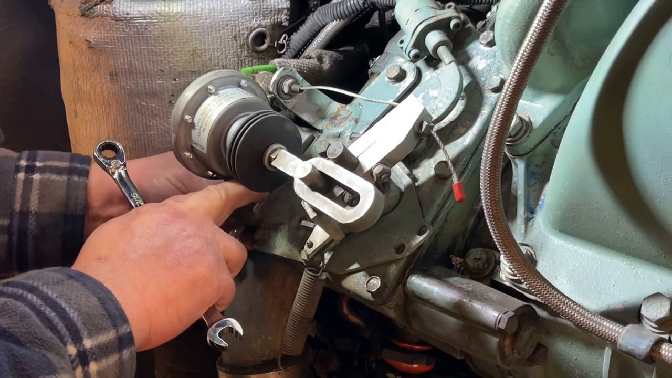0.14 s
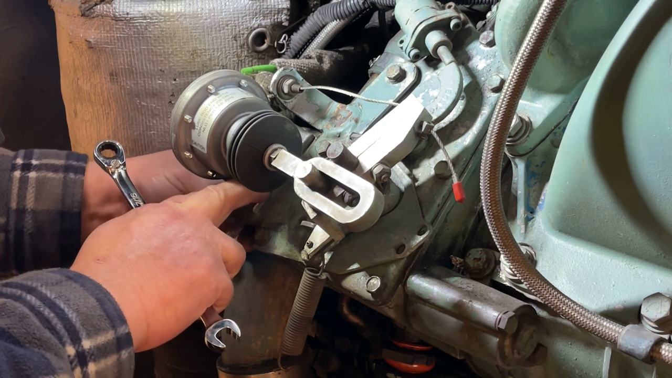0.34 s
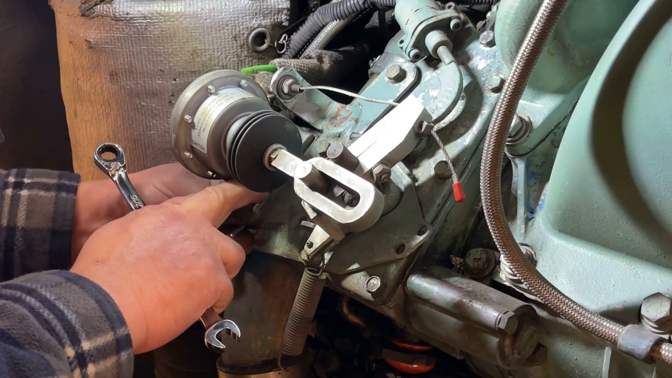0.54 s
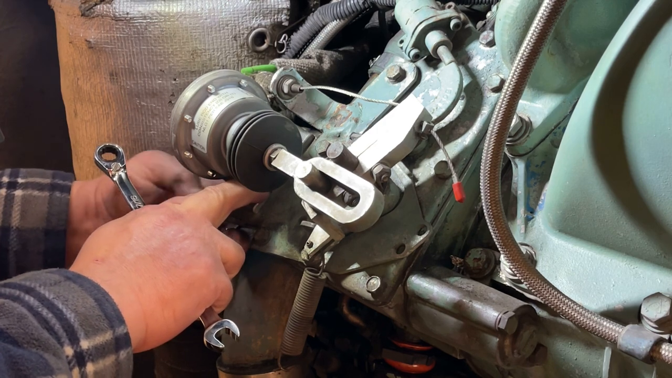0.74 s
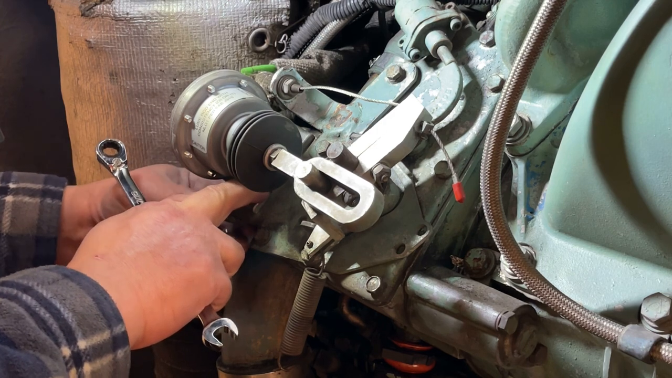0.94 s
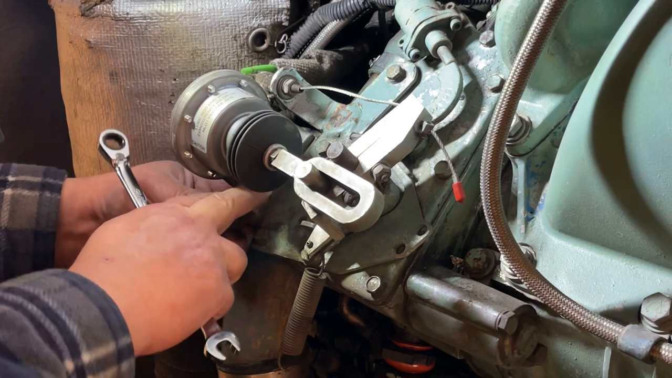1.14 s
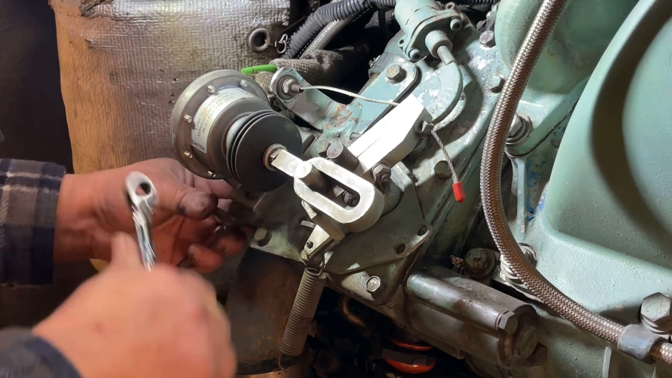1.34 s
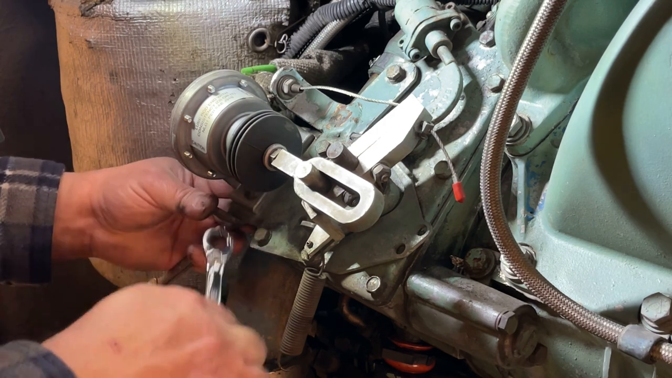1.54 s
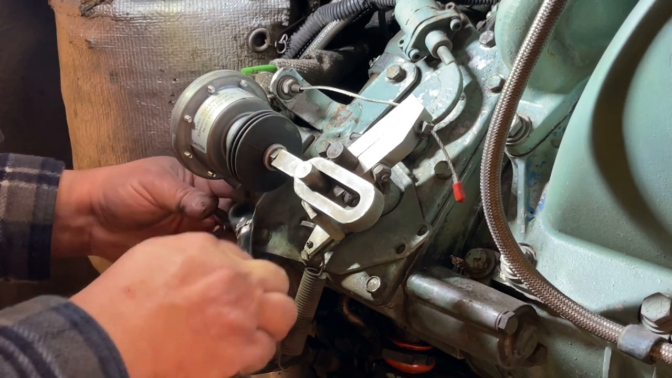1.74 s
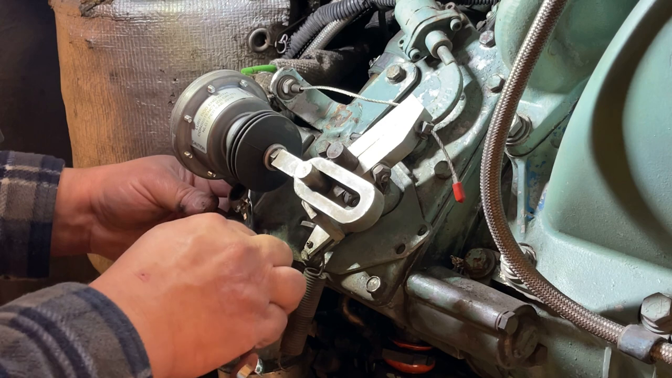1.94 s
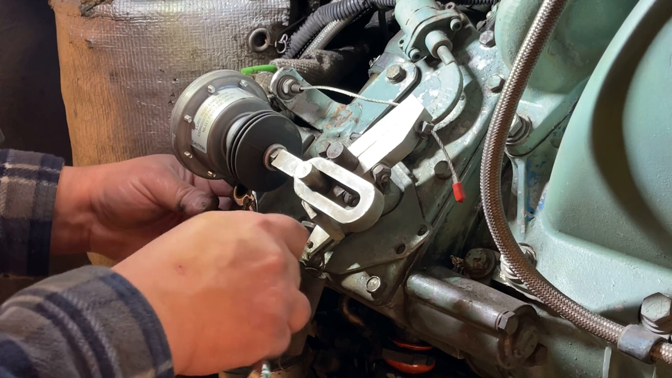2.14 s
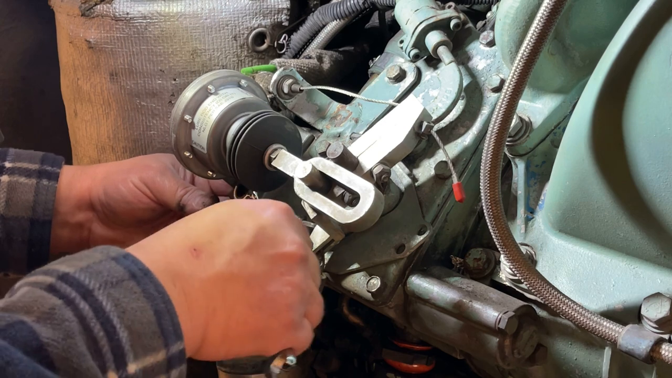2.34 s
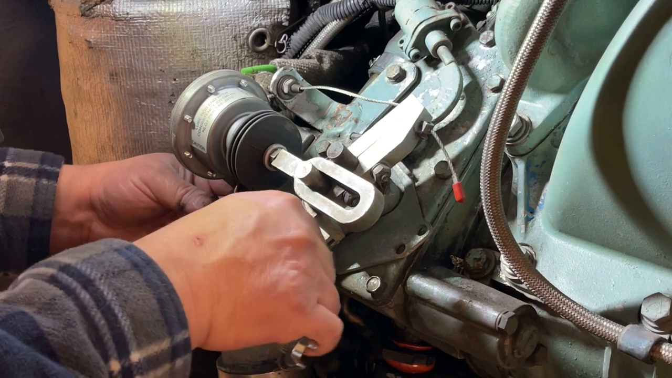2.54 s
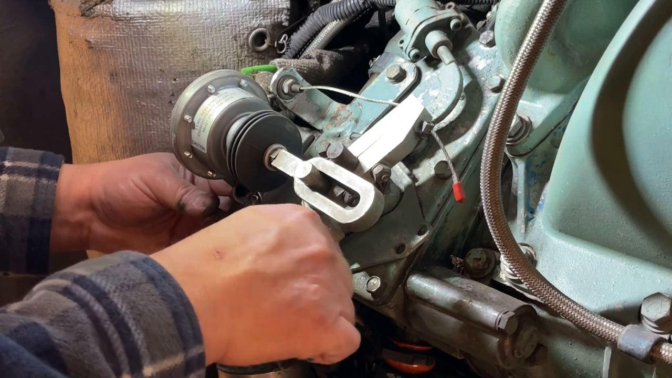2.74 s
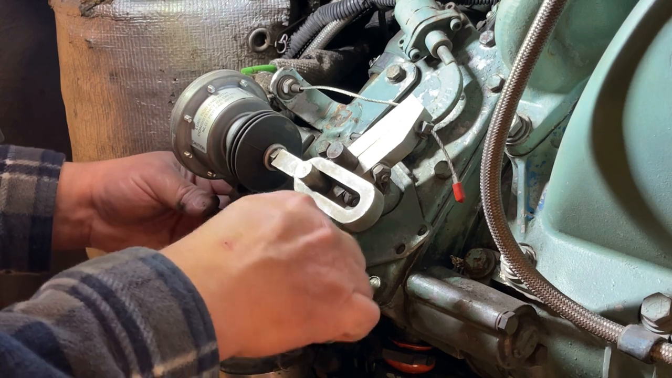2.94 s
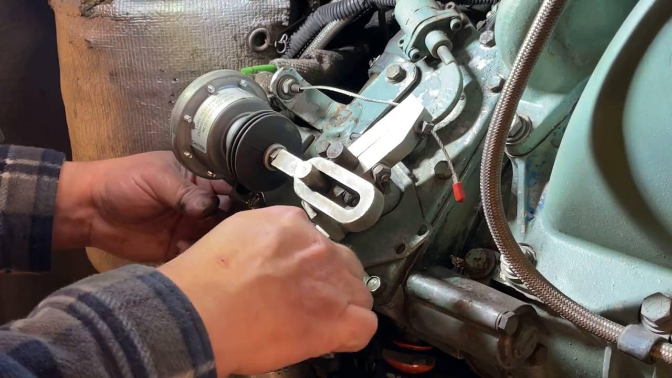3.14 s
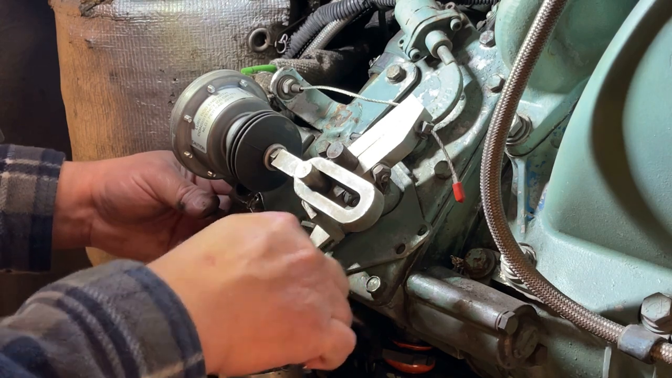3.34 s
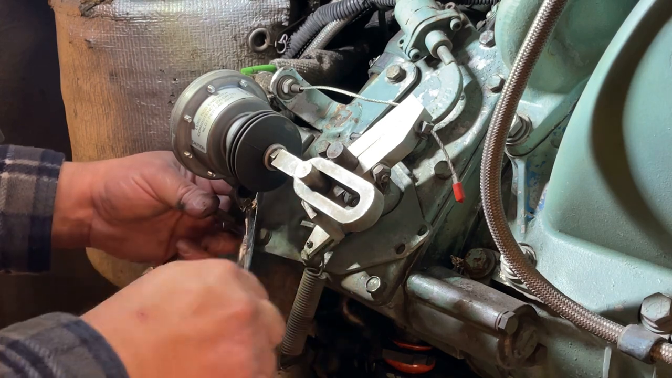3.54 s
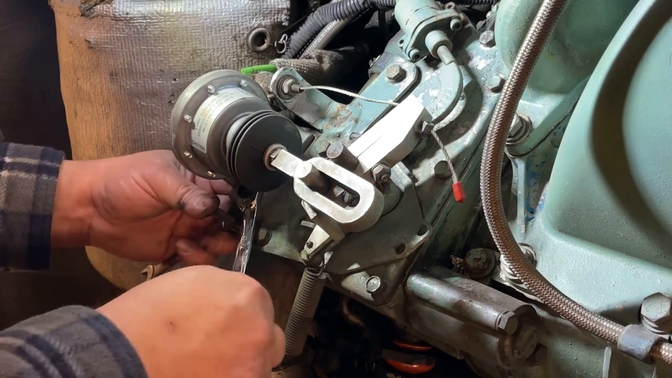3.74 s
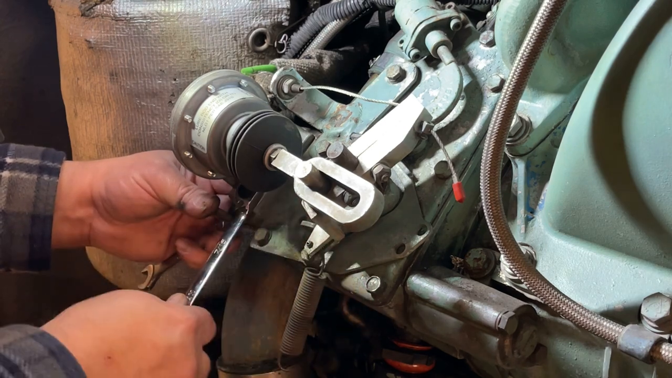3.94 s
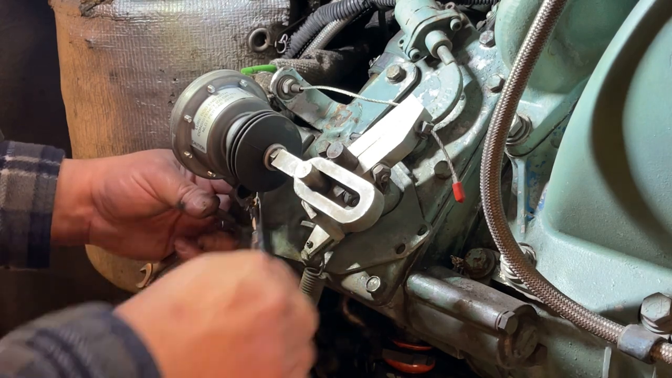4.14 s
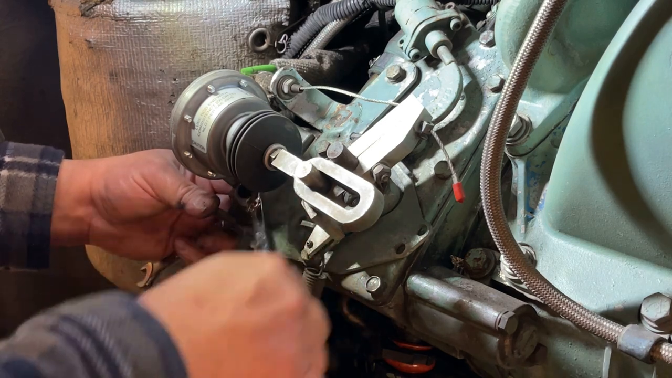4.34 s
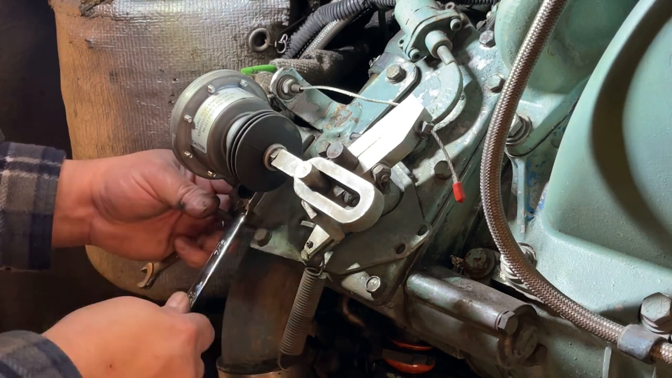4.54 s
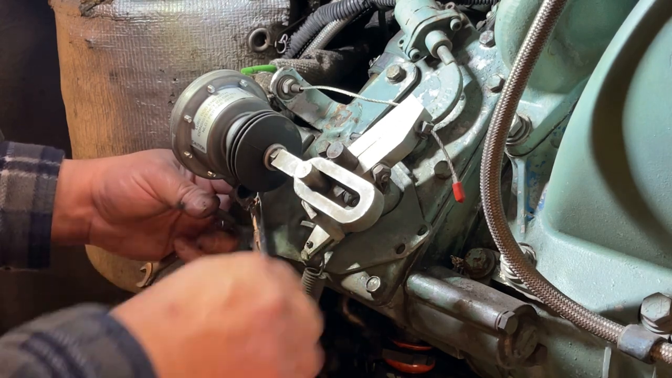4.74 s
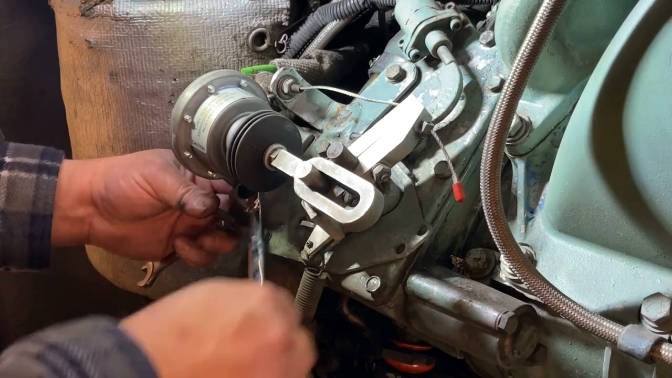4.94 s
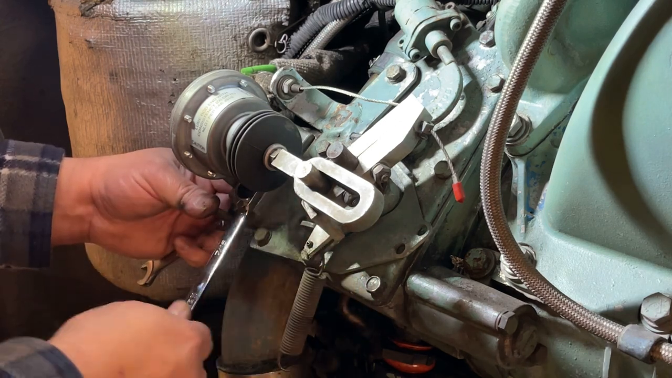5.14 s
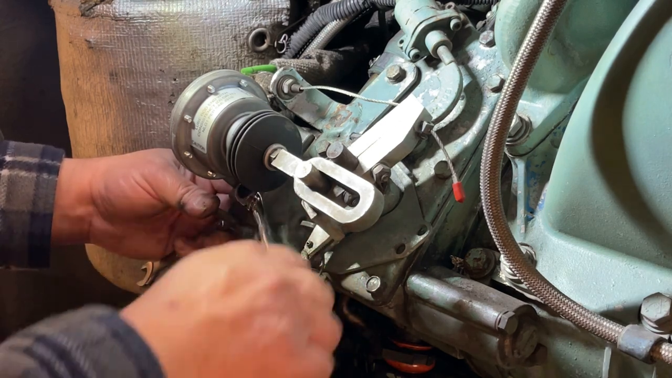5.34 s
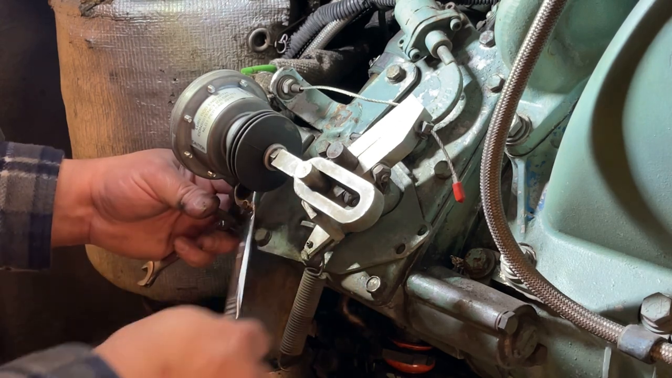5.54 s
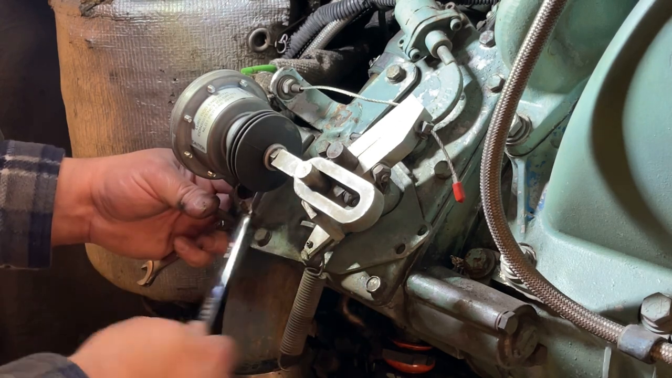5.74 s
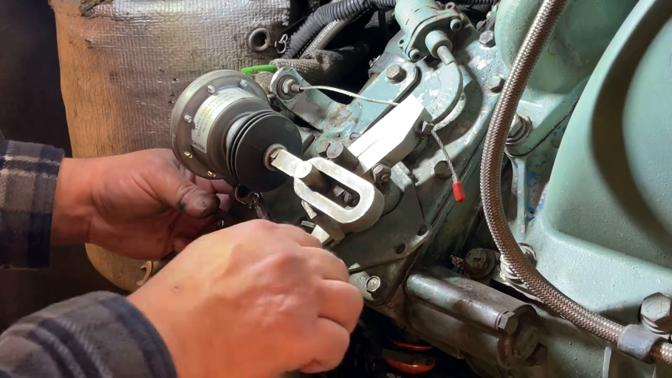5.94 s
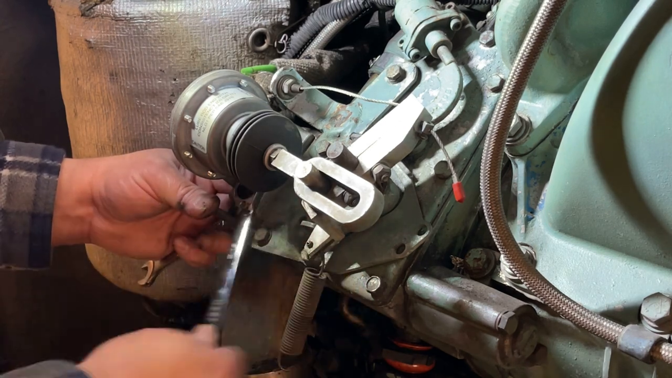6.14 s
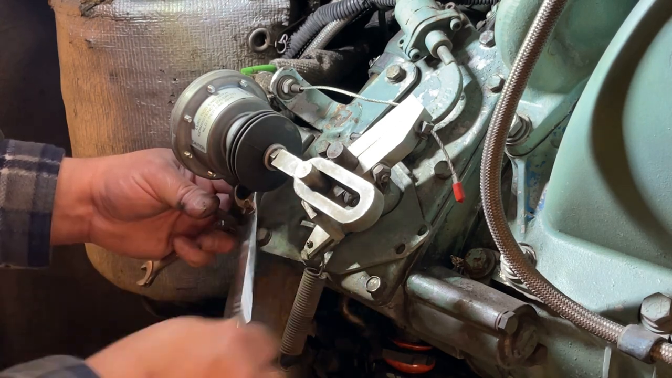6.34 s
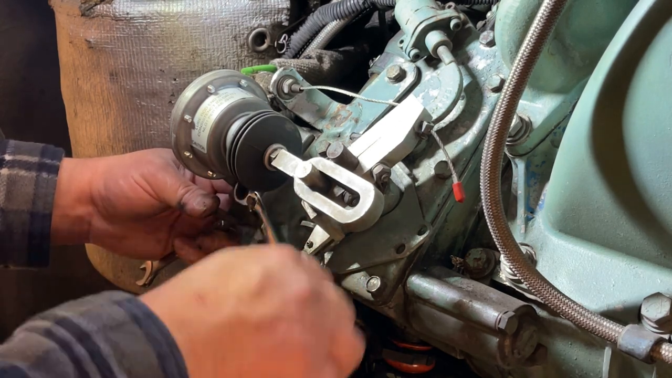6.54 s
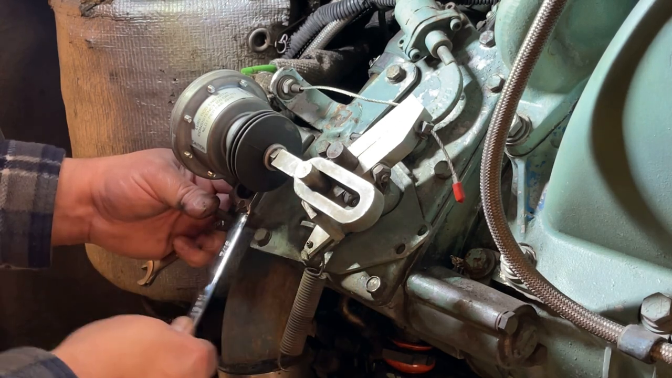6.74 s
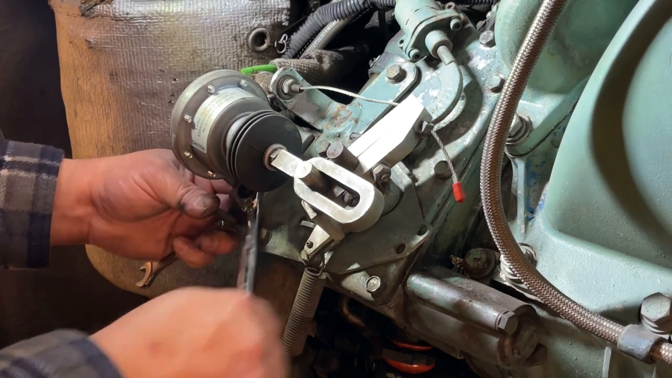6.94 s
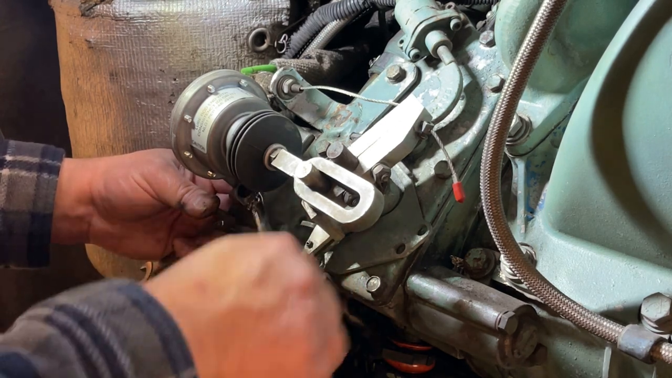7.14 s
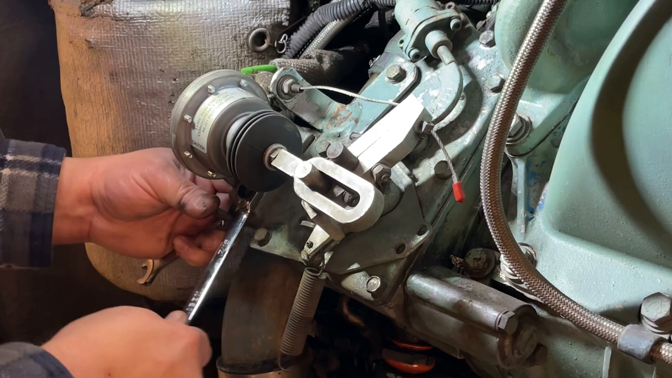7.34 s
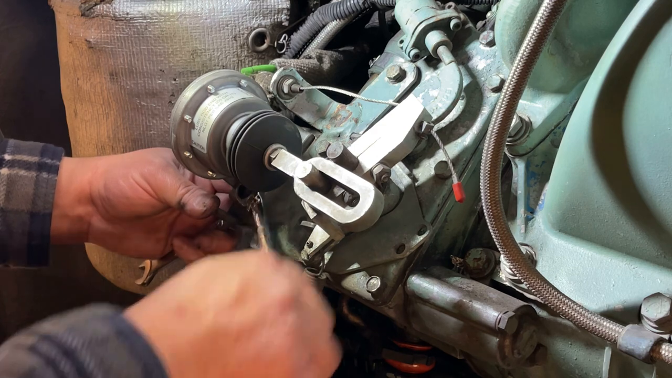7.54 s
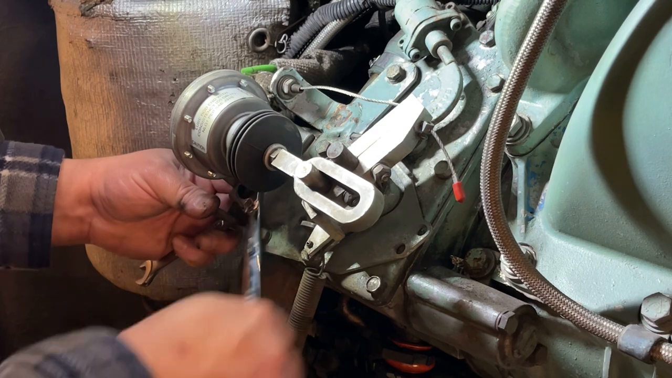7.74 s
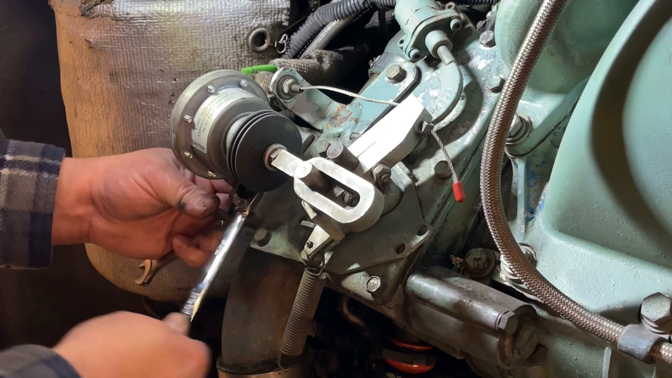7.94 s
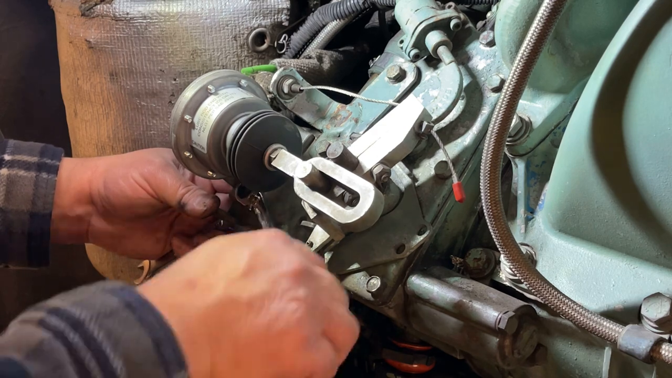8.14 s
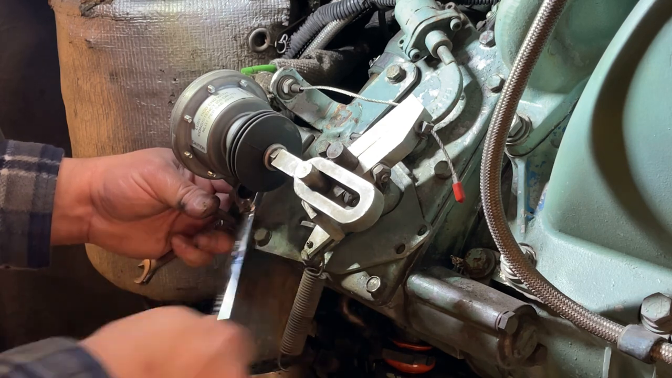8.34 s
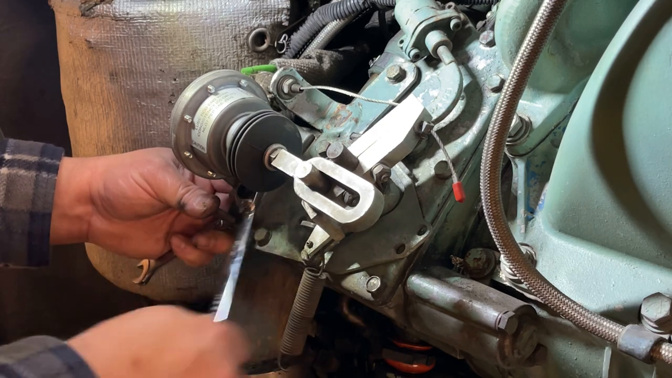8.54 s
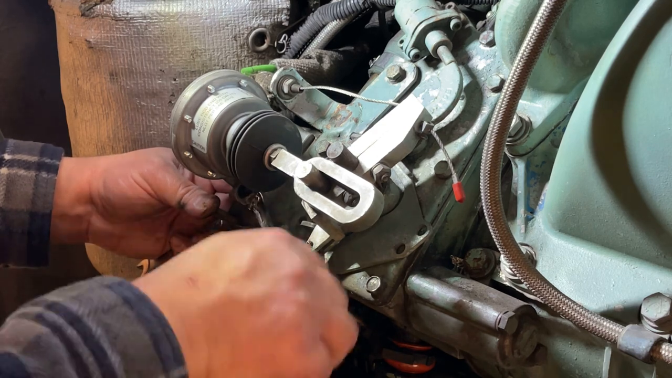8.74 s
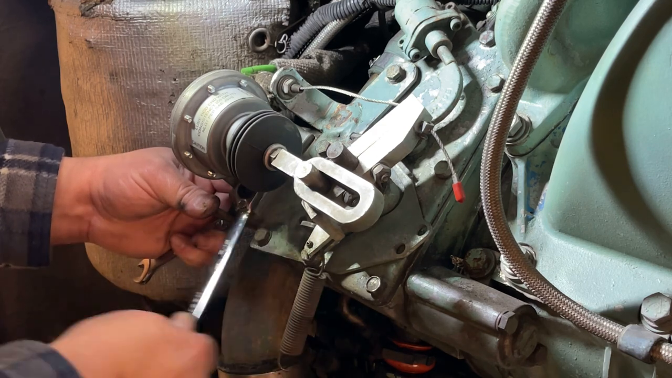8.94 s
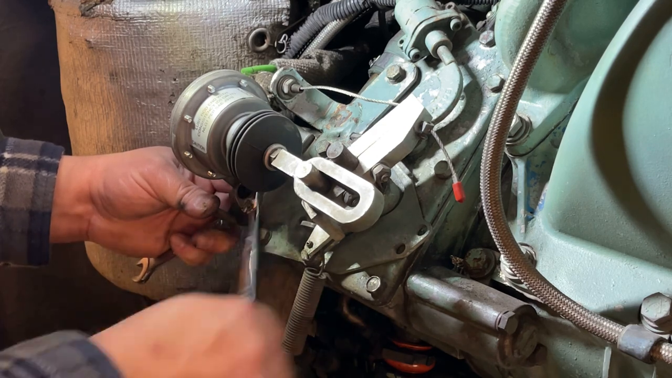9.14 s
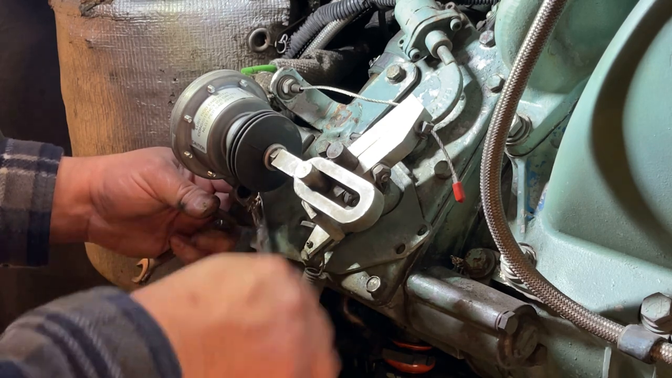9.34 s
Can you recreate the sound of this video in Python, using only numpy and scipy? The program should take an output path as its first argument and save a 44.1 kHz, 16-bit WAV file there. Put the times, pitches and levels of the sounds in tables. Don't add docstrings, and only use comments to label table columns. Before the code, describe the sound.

A quiet workshop heard from close to a phone, about 9.5 seconds long, with a low, slowly throbbing building hum and thin air noise throughout. For the first two seconds there are only very faint soft taps and hand or sleeve rubs. At about 2.0 and 2.8 light steel clinks sound as the spanner is fitted, then at 3.4 comes one hard, bright clank, the loudest event. From 4.0 the ratchet works: crisp bursts at roughly 4.0, 4.6, 5.2, 5.7, 6.3, 6.8, 7.4, 7.9, 8.5 and 9.1, each seven to nine thin, high metallic clicks in a tenth to a fifth of a second, generally slowing towards its end. Between bursts come small knocks on bolt and engine, short gritty scrapes, sliding steel and loose pawl ticks, with stronger clanks near 5.1, 5.7 and 6.6. Short bright room reflections follow the clicks.

```python
import sys
import numpy as np
from scipy import signal
from scipy.fft import rfft, irfft, next_fast_len
from scipy.io import wavfile
from scipy.ndimage import uniform_filter1d, map_coordinates

SR = 44100
rng = np.random.default_rng(int(sys.argv[2]) if len(sys.argv) > 2 else 0)


def undo_db(level):
    steps = np.asarray(level, float) / 20
    return 10 ** steps


def master(y):
    cut = np.clip(np.atleast_2d(y).T, -1, 1)
    pcm = np.round(cut * 32767)
    wavfile.write(sys.argv[1], SR, pcm.astype(np.int16))


N = 418509

# [t/s, level/dB, shank ring
# re level/dB, block knock re level/dB, struck part f/Hz]
CLANKS = [(1.9778, -30.5, 0.5, -5.5, 6440), (2.7674, -28, -1, -11, 5520), (3.408, -64, 4.5, -19.5, 7400),
          (3.4397, -3.5, -7.5, -21, 6540), (3.8054, -41, -4.5, -11, 3680), (4.437, -70, 24, 21.5, 3730),
          (4.857, -45.5, -3.5, -8, 7500), (5.0332, -50, 21, 16, 1540), (5.119, -29.5, 10, 1.5, 5200),
          (5.682, -26.5, 0, 0.5, 1850), (6.261, -45.5, -7.5, 6, 5500), (6.5649, -24.5, -11, -16.5, 5420),
          (6.5689, -20.5, 2, 2.5, 2290), (7.3844, -46.5, -11, -11, 7500), (8.478, -55, -8.5, 5, 5500),
          (9.044, -48, 6, -25, 7080)]
# [t/s, level/dB, block knock re level/dB, struck part f/Hz]
TAPS = [(0.4594, -70.5, 12, 800), (0.5343, -54, 4, 1400), (0.5697, -61.5, 11, 2000),
        (1.0894, -74.5, 10, 810), (1.8128, -75, 23.5, 970), (1.8453, -69.5, 16, 915),
        (1.8894, -78.5, 21.5, 902), (2.0303, -51.5, 9, 921), (2.7249, -55, 11.5, 950),
        (3.0481, -65, 5, 990), (3.9594, -70, 14.5, 980), (4.4678, -47, 6.5, 964),
        (4.5501, -41.5, 1.5, 2020), (5.4114, -55.5, 10, 920), (5.5748, -72.5, 31, 980),
        (6.1451, -59, 20, 939), (6.4894, -67, 9, 2010), (6.5302, -56, 15, 970), (7.0994, -88, 26.5, 2480),
        (7.1501, -56.5, 3, 1940), (7.66, -55.5, 9, 2000), (7.8404, -67.5, 18.5, 1620),
        (7.8564, -66, 11.5, 2000), (8.2094, -58.5, 6.5, 2540), (8.7642, -54.5, 3.5, 2030),
        (8.9494, -80.5, 29.5, 1063), (8.977, -76.5, 21.5, 840), (9.3177, -48.5, -5.5, 2520)]


def unit(x):
    return x / np.sqrt(np.mean(x ** 2) + 1e-20)


def along(points, hz):
    f, v = np.transpose(points)
    return np.interp(np.log(hz + 1), np.log(f + 1), v)


def wobble(knots_per_s):
    knots = rng.standard_normal(int(N * knots_per_s / SR) + 4)
    return map_coordinates(knots, [np.arange(N) * knots_per_s / SR])


def filtered(x, response):
    m = next_fast_len(N + SR // 2)
    return irfft(rfft(x, m) * response(np.fft.rfftfreq(m, 1 / SR)), m)[..., :N]


def friction(colour, unevenness_db):
    grains = undo_db(unevenness_db) * rng.standard_normal(N)
    return unit(filtered(grains, lambda hz: undo_db(along(colour, hz))))


def hum():
    # [t/s, level/dB]
    throb = [(0.0, -53), (1.2, -49.5), (2.6, -55), (3.5, -50), (5.6, -51.5), (6.4, -50), (8.3, -52),
             (9.49, -51)]
    # [f/Hz, density/dB per Hz]
    rumble = [(16, -44.5), (28, -25.5), (38, -7.5), (59, -3.5), (76, 3.5), (119, -10), (136, -14),
              (190, -17.5), (216, -17), (300, -24.5), (390, -46), (660, -120)]
    # [f/Hz, density/dB per Hz]
    air = [(150, -3.5), (220, -11), (400, -13.5), (800, -19.5), (1300, -31.5), (2200, -40), (3200, -47.5),
           (4200, -47.5), (6500, -48.5), (8500, -48), (9500, -48), (11500, -50), (12800, -56), (14000, -74)]
    # [f/Hz, correlation/1]
    alike = [(60, 0.99), (150, 0.97), (300, 0.38), (800, 0.089), (1400, 0.42), (2000, 1), (6000, 0.21),
             (10300, 0.74), (12500, 0.61)]
    air_db = -62.5

    def mid_side_noise(colour):
        def response(hz):
            angle = np.arccos(np.clip(along(alike, hz), -1, 1)) / 2
            return undo_db(along(colour, hz)) * np.array([np.cos(angle), np.sin(angle)])
        return unit(filtered(rng.standard_normal((2, N)), response))

    throb_db = np.interp(np.arange(N) / SR, *np.transpose(throb))
    low = undo_db(throb_db - 2.5 + 1.2 * wobble(6.4)) * mid_side_noise(rumble)
    high = undo_db(air_db + 0.28 * wobble(1)) * mid_side_noise(air)
    mid, side = low + high
    return np.array([mid + side, mid - side])


def shop(x):
    # [f/Hz, t60/s]
    t60 = [(300, 0.78), (2000, 0.13), (5200, 0.15), (6500, 0.2), (7800, 0.15), (10000, 0.18),
           (12800, 0.077), (14000, 0.039)]
    apart_db = -10
    far_db, far_longer = -20.5, 2.9
    step, delay = SR // 10, 90
    out = np.zeros((2, N + SR))
    for at in np.arange(0, N, step):
        hz, t, z = signal.stft(rng.standard_normal((2, SR // 2)), SR, nperseg=256)
        t60_s = along(t60, hz)[:, None]
        decay = undo_db(-60 * t / t60_s) + undo_db(far_db - 60 * t / far_longer / t60_s)
        shared, own = signal.istft(z * decay, SR, nperseg=256)[1]
        own = undo_db(apart_db) * own
        tail = np.array([shared + own, shared - own]) / np.linalg.norm(shared)
        wet = signal.fftconvolve(x[None, at:at + step], tail, axes=1)
        out[:, at + delay:at + delay + wet.shape[1]] += wet
    return out[:, :N]


def rustle():
    # [start t/s, hold/s, cloth level/dB, steel level/dB]
    slides = [(0.516, 0.058, -77.5, -90), (1.504, 0.087, -79, -95), (1.812, 0.24, -77, -89),
              (2.7, 0.055, -75, -74.5), (3.592, 5.7, -80, -93.5), (4.182, 0.37, -85, -73.5),
              (4.62, 0.023, -71, -73), (5.19, 0.011, -60, -60.5), (5.836, 0.31, -82, -79.5),
              (6.617, 0.056, -81.5, -64), (6.788, 0.21, -62.5, -68), (8.026, 0.027, -72, -92.5),
              (8.62, .03, -66.5, -74.5), (7.551, .1, -81.5, -78), (8.153, .1, -82, -84),
              (9.21, 0.14, -82, -77)]
    # [f/Hz, level/dB]
    cloth = [(300, -33.5), (800, -4.5), (2200, 0.5), (4000, -14), (7000, -30)]
    # [f/Hz, level/dB]
    steel = [(3000, -16.5), (5000, 8.5), (7500, -4.5), (9200, 6.5), (11300, 0.5), (12500, -9.5),
             (13500, -33.5)]
    swell_db_per_s, fade_db_per_s = 150.5, 135
    grain_db, drift_db = 2.2, 1.2

    def grain(colour):
        return friction(colour, grain_db * wobble(120) + drift_db * wobble(4.2))

    t = np.arange(N) / SR
    start, hold, cloth_db, steel_db = np.transpose(slides)[..., None]
    before_s = np.clip(start - t, 0, None)
    after_s = np.clip(t - start - hold, 0, None)
    shape = undo_db(-swell_db_per_s * before_s - fade_db_per_s * after_s)
    cloth_level = (undo_db(cloth_db - 2) * shape).sum(axis=0)
    steel_level = (undo_db(steel_db - 6) * shape).sum(axis=0)
    return cloth_level * grain(cloth) + steel_level * grain(steel)


def scrape():
    # [f/Hz, level/dB]
    grit = [(250, -15.5), (500, -7), (1000, -2), (2600, 0), (6000, -13), (12000, -23)]
    scrape_db, t60_s, rise_s = -13.5, 0.067, 0.0045
    hits = [(s, db + block) for s, db, _, block, _ in CLANKS]
    hits += [(s, db + block) for s, db, block, _ in TAPS]
    s, db = np.transpose(hits)
    t = np.arange(SR // 4) / SR
    drag = undo_db(scrape_db - 60 * t / t60_s) * (1 - np.exp(-t / rise_s))
    impulses = np.bincount(np.round(s * SR).astype(int), undo_db(db), N)
    return signal.fftconvolve(impulses, drag)[:N] * friction(grit, 1.3 * wobble(300))


def contact(count, delay_s, chatter_db, chatter_t60):
    t = np.arange(SR // 40) / SR - delay_s * (1 + 0.18 * rng.uniform(-1.1, 1, (count, 1)))
    chatter = (t > 0) * undo_db(chatter_db - 60 * abs(t) / chatter_t60) * rng.standard_normal(t.shape)
    force = np.sinc(t * SR) + chatter
    return force / np.linalg.norm(force, axis=1, keepdims=True)


def ring(modes, count):
    scatter_db, drift = 3, .014
    t = np.arange(SR // 12) / SR
    hz, width, db = np.moveaxis(modes, -1, 0)[..., None]
    level, shift = rng.standard_normal((2, count, np.shape(modes)[-2], 1))
    decay = np.exp(-np.pi * width * t)
    swell = decay * (1 - decay ** 3)
    partials = swell * np.sin(2 * np.pi * hz * (1 + drift * shift) * t)
    body = (undo_db(db + scatter_db * level) * width * partials).sum(axis=1)
    return body / np.linalg.norm(body, axis=1, keepdims=True)


def peak_gain(x):
    power = uniform_filter1d(2 * x ** 2, size=40, axis=1)
    return 1 / np.sqrt(power.max(axis=1, keepdims=True))


def blows(rows, base, part_db, landing_s, early_db, late_db, chatter_db, chatter_t60):
    # [f/Hz, width/Hz, level/dB]
    pawl_modes = [(10030, 2100, -0.5), (11040, 630, 4), (11900, 970, -10.5), (12850, 740, -11.5),
                  (14000, 2600, -18), (15400, 450, -28.5)]
    # [f/Hz, width/Hz, level/dB]
    head_modes = [(7030, 647, -3), (8280, 250, -4.5), (9570, 67, -10.5), (9465, 480, 3.5)]
    # [f/Hz, width/Hz, level/dB]
    shank_modes = [(4070, 400, -25.5), (4550, 606, -5.5), (5617, 830, -1), (6160, 370, -7.5),
                   (6340, 500, -5.5)]
    # [f/Hz, width/Hz, level/dB]
    cover_modes = [(368, 15.25, -3.5), (401.5, 28, -2), (552, 140, -8.5)]
    part_width = .13
    s, db, shank_db, base_db, cover_db, part_hz = np.transpose(rows)[..., None]
    count = len(s)

    slip = contact(count, 0, chatter_db, chatter_t60)
    land = contact(count, landing_s, chatter_db, chatter_t60)
    late = land + undo_db(early_db) * slip

    part_modes = np.stack([part_hz, part_width * part_hz, 0 * part_hz], axis=-1)
    part = undo_db(part_db) * ring(part_modes, count)
    on_tool = part_hz > 3000
    pawl = ring(pawl_modes, count)
    head = undo_db(-4.5) * ring(head_modes, count)
    shank = ring(shank_modes, count) + on_tool * part
    engine = undo_db(base_db) * (ring(base, count) + ~on_tool * part)
    engine = engine + undo_db(cover_db) * ring(cover_modes, count)

    def struck(force, body):
        return signal.fftconvolve(force, body, axes=1)

    def placed(x):
        at = np.round(s * SR).astype(int) + np.arange(x.shape[1])
        return np.bincount(at.ravel(), (undo_db(db) * x).ravel(), N + SR)[:N]

    bright = struck(slip + undo_db(late_db) * land, pawl) + struck(late, head)
    middle = struck(late, shank)
    near = peak_gain(bright) * bright + undo_db(shank_db) * peak_gain(middle) * middle + struck(late, engine)
    spread = undo_db(16.5) * (pawl + head + undo_db(shank_db) * shank) + engine
    highpass = signal.butter(3, 280, "high", fs=SR, output="sos")
    return signal.sosfilt(highpass, [placed(near), placed(spread)])


def knocks():
    # [t/s, level/dB]
    ticks = [(1.03, -65), (1.4203, -64), (3.022, -57.5), (3.8644, -58), (4.2789, -47), (4.8748, -48),
             (6.1894, -61), (6.7501, -51), (7.2537, -56.5), (8.455, -64)]
    # [shank/dB, block/dB, cover/dB, struck part f/Hz]
    tick = (-10, -11, -7, 1100)
    # [f/Hz, width/Hz, level/dB]
    flange = [(960, 170, -1), (1280, 300, -5), (1560, 260, -3), (2020, 260, -2), (2480, 320, -4),
              (2950, 400, -7)]
    clank_cover_db, tap_cover_db = -10, 3.5
    tap_shank_share = 0.5

    def balanced(rows):
        return [(s, db - 9, shank - 1.5, block + 17, cover + 22, hz) for s, db, shank, block, cover, hz in rows]

    hard = [(s, db, shank, block, block + clank_cover_db, hz) for s, db, shank, block, hz in CLANKS]
    soft = [(s, db, tap_shank_share * block, block, block + tap_cover_db, hz) for s, db, block, hz in TAPS]
    soft += [(s, db, *tick) for s, db in ticks]
    hard_sound = blows(balanced(hard), flange, part_db=0, landing_s=.0008, early_db=-4, late_db=-4.5,
                       chatter_db=-16, chatter_t60=.018)
    soft_sound = blows(balanced(soft), flange, part_db=-0.5, landing_s=.002, early_db=-2.5, late_db=-11,
                       chatter_db=-9, chatter_t60=.03)
    return hard_sound + soft_sound


def teeth():
    # [first tooth t/s, teeth/1, shortest gap/ms, fastest tooth/1, braking/tooth^-2]
    strokes = [(4.0116, 9, 14.99, 1.69, 0.0386), (4.6062, 8, 14.83, 1.03, 0.0291),
               (5.1789, 8, 13.65, 1.56, 0.028), (5.7213, 9, 11.62, -1.81, 0.0116),
               (6.2727, 7, 9.71, 1.54, 0.085), (6.8439, 8, 20.31, 1.78, 0.0241),
               (7.402, 8, 13.88, -0.85, 0.0142), (7.9434, 9, 10.73, 2.19, 0.0448),
               (8.4933, 9, 11.78, -2.0, 0.0107), (9.0601, 9, 11.23, 0.93, 0.0283)]
    # [t/s, level/dB, shank re head ring/dB, first tooth/dB, last tooth/dB]
    grip = [(4.01, -15.5, -10.5, 0, -2.5), (4.6, -16.5, -12, -3, -5.5), (5.18, -17.5, -15, -1.5, -4),
            (5.72, -16.5, -16.5, -4, -1), (6.27, -14.5, -19, -7, -10), (6.84, -16.5, -14, -0.5, -4.5),
            (7.4, -16, -12, 0, -3.5), (7.94, -15, -16, -8.5, -5), (8.49, -14.5, -14.5, -2.5, -4.5),
            (9.06, -16, -14.5, -3, -2.5)]
    lead_in_fade = 0.15
    tooth_scatter_db, shank_scatter_db = 1.3, 2.5
    weak_is_dull = .6
    rows = []
    for stroke, pressure in zip(strokes, grip):
        first_s, count, gap_ms, fastest, braking = stroke
        _, db, shank_db, first_db, last_db = pressure
        k = np.arange(int(count))
        gaps_s = gap_ms / 1000 * np.exp(braking * (k - fastest) ** 2)
        chance = rng.standard_normal((len(k), 2))
        weaker_db = first_db * lead_in_fade ** k + last_db * (k == k[-1]) + tooth_scatter_db * chance[:, 0]
        shank = shank_db - weak_is_dull * weaker_db + shank_scatter_db * chance[:, 1]
        rows += zip(first_s + np.cumsum(gaps_s) - gaps_s, db + weaker_db, shank)
    return rows


def ratchet():
    # [f/Hz, width/Hz, level/dB]
    block = [(1157, 250, -6), (1317, 250, -1.5), (2000, 143, 8), (2480, 96, 8), (2920, 2000, -44.5)]
    tooth_delay_s, block_db, cover_db, part_hz = .0005, -6, -9, 6500
    rows = [(s + tooth_delay_s, db - 4, shank_db + 0.5, block_db, cover_db, part_hz) for s, db, shank_db in teeth()]
    return blows(rows, block, part_db=-8, landing_s=.0011, early_db=-8.5, late_db=-6,
                 chatter_db=-16, chatter_t60=.014)


def scene():
    # [f/Hz, gain/dB]
    room_gain = [(300, -1.5), (1000, 0), (2500, -1), (6500, -3.5), (12500, -5)]
    # [f/Hz, gain/dB]
    room_top = [(12800, 0), (13600, -25)]
    near, spread = ratchet() + knocks() + rustle() + scrape()
    walls = filtered(spread, lambda hz: undo_db(along(room_gain, hz) + along(room_top, hz)))
    return near + undo_db(-11.5) * shop(walls) + hum()


def band_limit(x):
    return signal.sosfilt(signal.butter(12, 16800, fs=SR, output="sos"), x)


def record(dry):
    # [f/Hz, gain/dB]
    mic = [(22, -17.5), (40, -3.5), (12000, 5), (13000, 3), (14000, -8.5), (16000, -9), (16950, -54.5)]
    # [f/Hz, phase/rad]
    lead = [(0, 0), (700, -.4), (1500, 0), (2400, 0), (3500, -.45), (5500, -.7), (7000, -.45), (8100, -.9),
            (8790, 0), (9300, 1.4), (10300, 3.14), (11700, 6.1), (12200, 6.3), (13500, 9.4), (15200, 12.6)]
    # [f/Hz, gain/dB]
    tilt = [(300, 0.5), (750, -1.5), (1400, -2.5), (2000, 0)]
    half = np.array([[.5], [-.5]])

    def ports(hz):
        twist = np.exp(1j * half * np.interp(hz, *np.transpose(lead)))
        return undo_db(along(mic, hz) + half * along(tilt, hz)) * twist

    return band_limit(filtered(dry, ports))


dry = scene()
out = record(dry)
master(out)
```